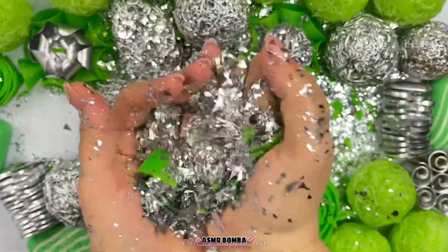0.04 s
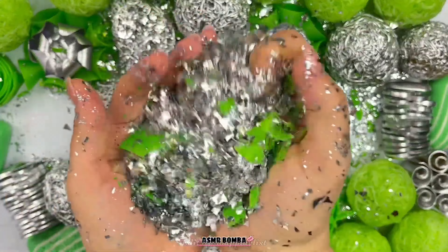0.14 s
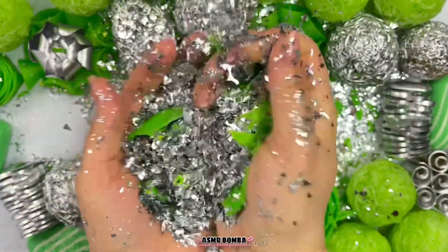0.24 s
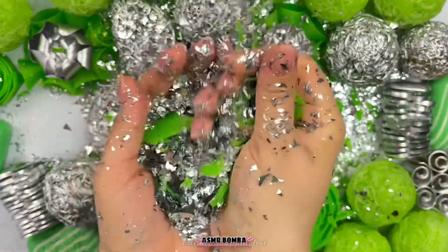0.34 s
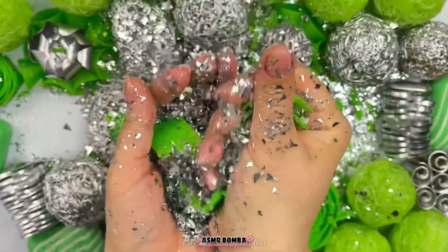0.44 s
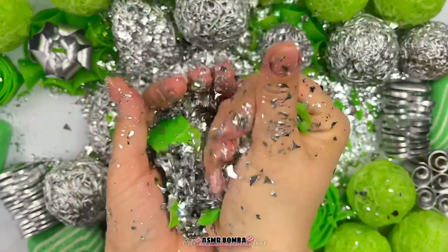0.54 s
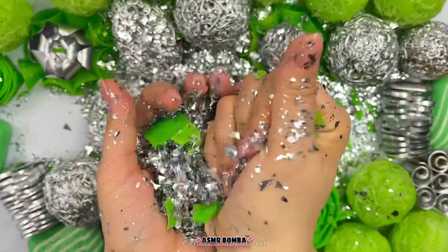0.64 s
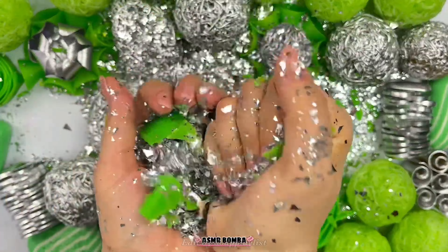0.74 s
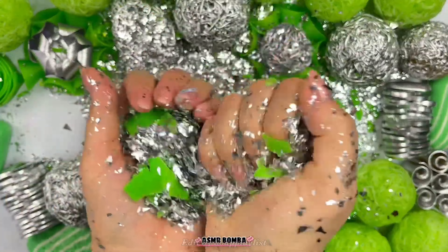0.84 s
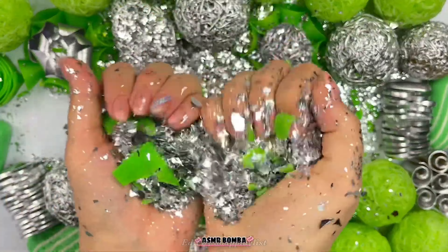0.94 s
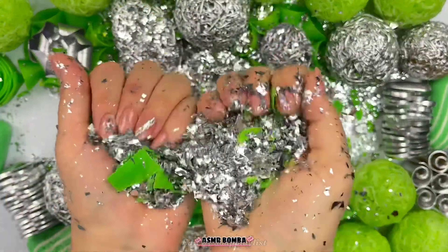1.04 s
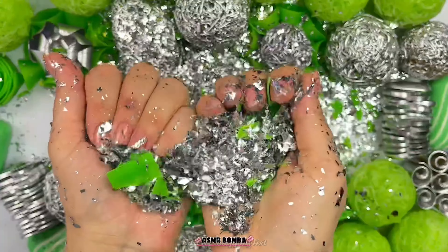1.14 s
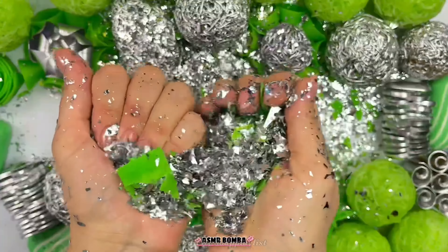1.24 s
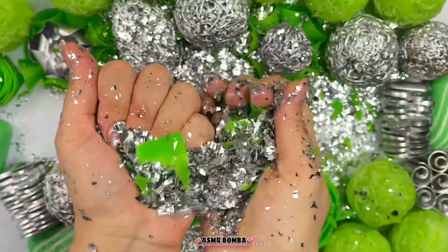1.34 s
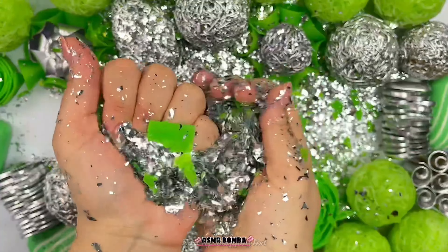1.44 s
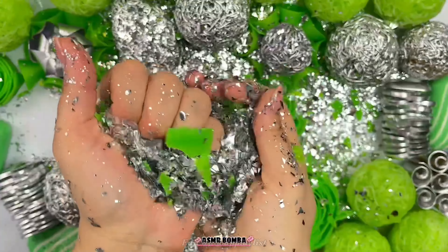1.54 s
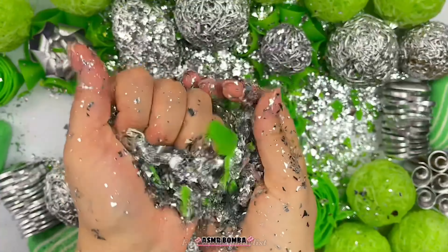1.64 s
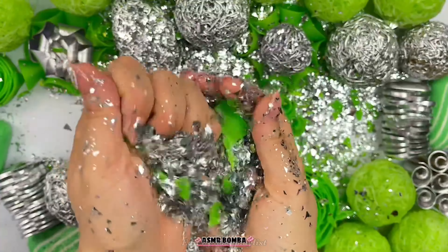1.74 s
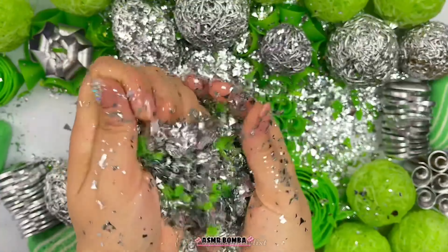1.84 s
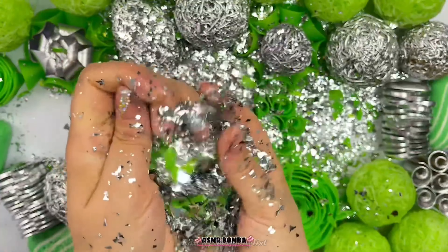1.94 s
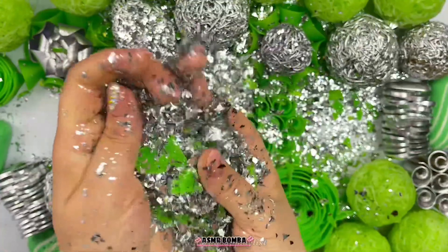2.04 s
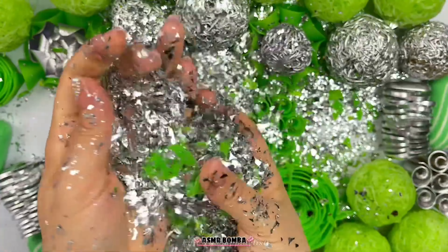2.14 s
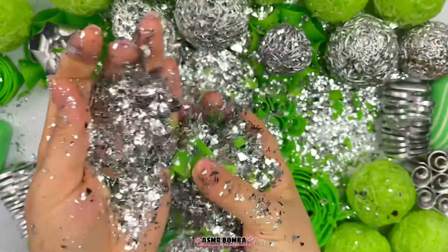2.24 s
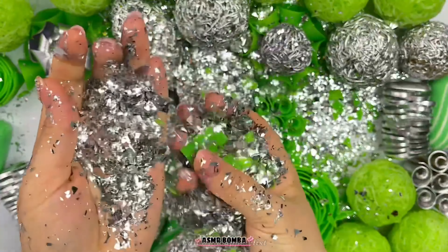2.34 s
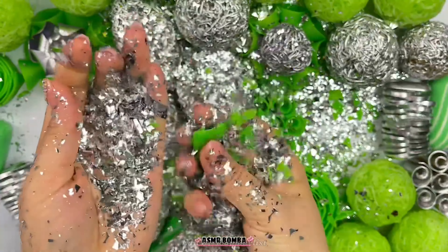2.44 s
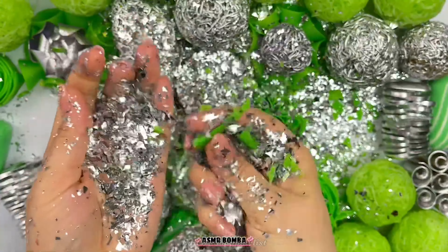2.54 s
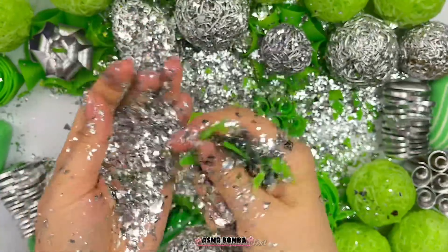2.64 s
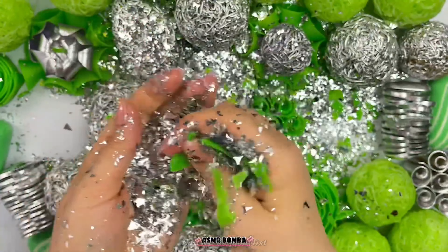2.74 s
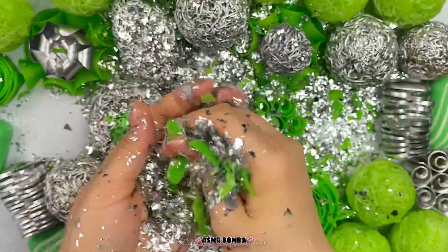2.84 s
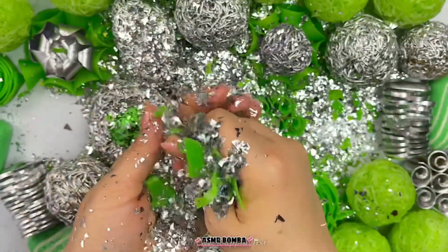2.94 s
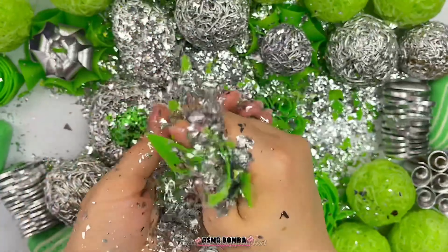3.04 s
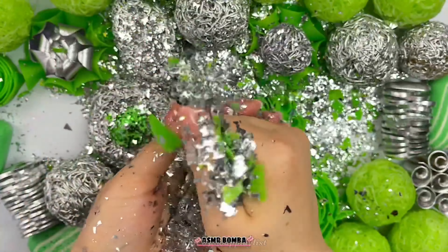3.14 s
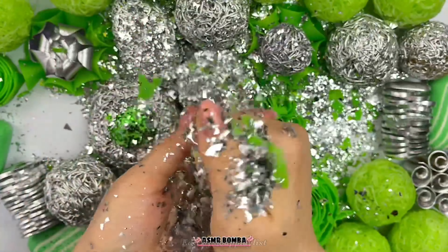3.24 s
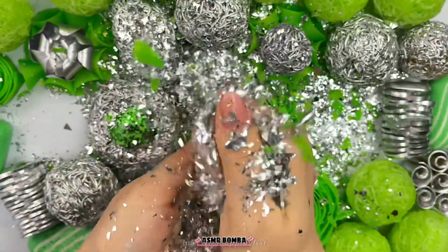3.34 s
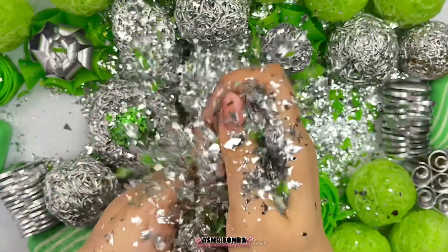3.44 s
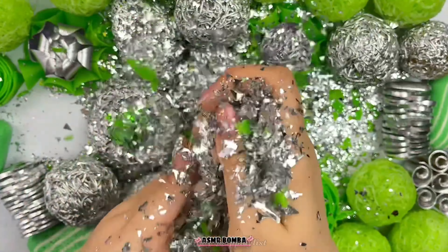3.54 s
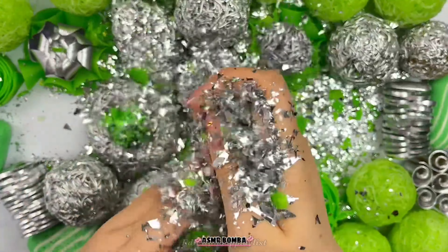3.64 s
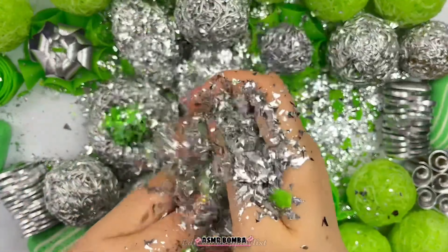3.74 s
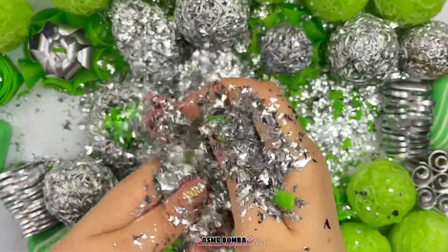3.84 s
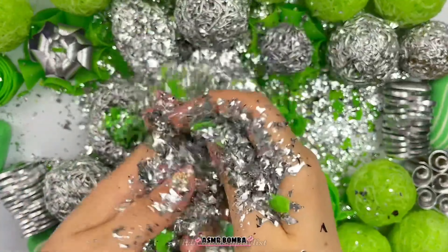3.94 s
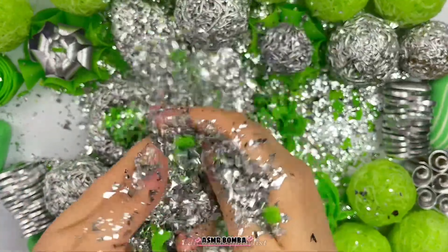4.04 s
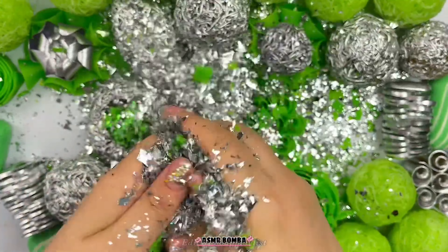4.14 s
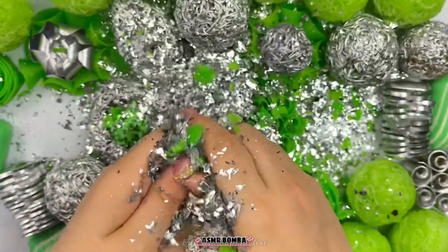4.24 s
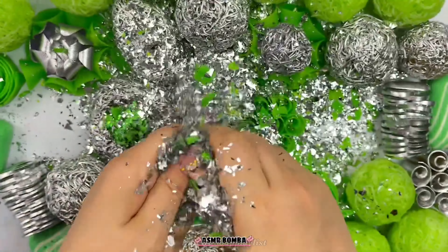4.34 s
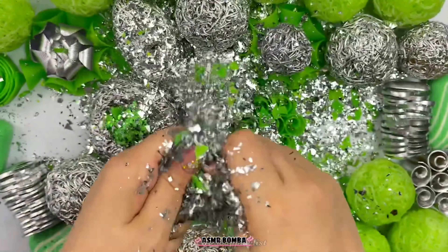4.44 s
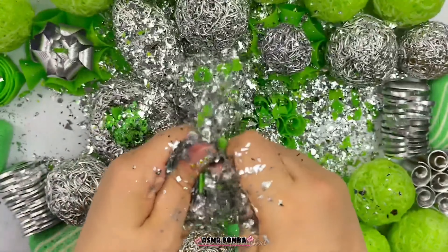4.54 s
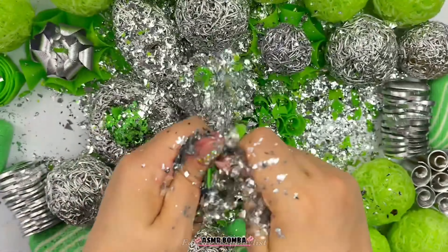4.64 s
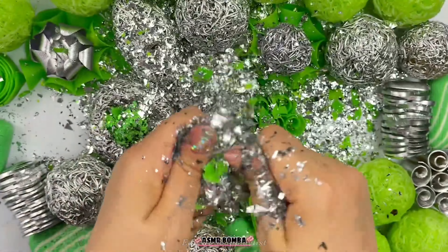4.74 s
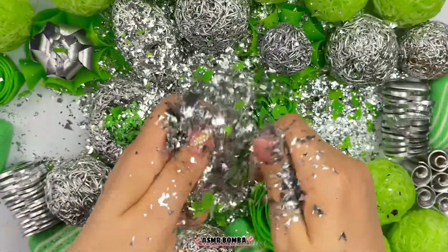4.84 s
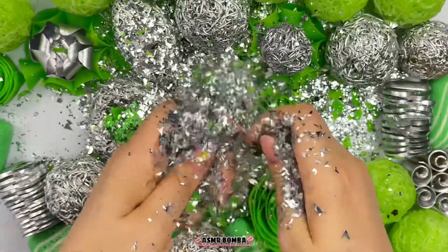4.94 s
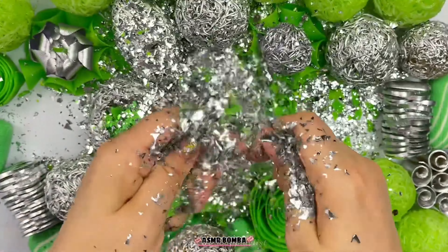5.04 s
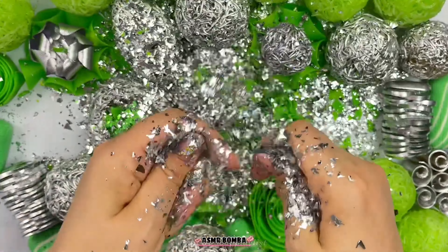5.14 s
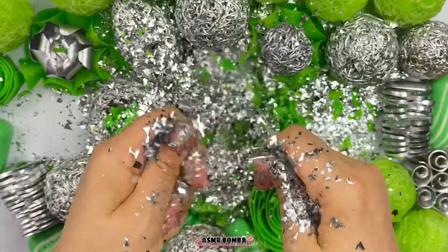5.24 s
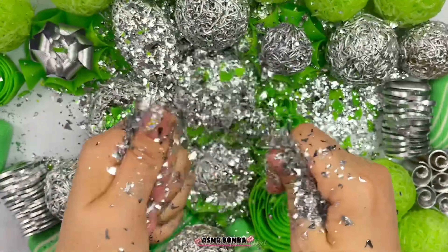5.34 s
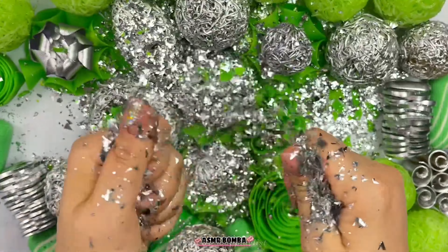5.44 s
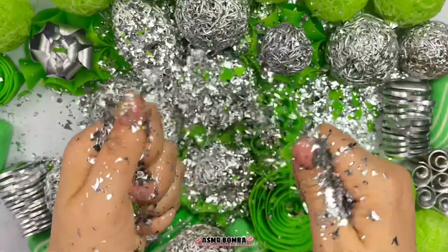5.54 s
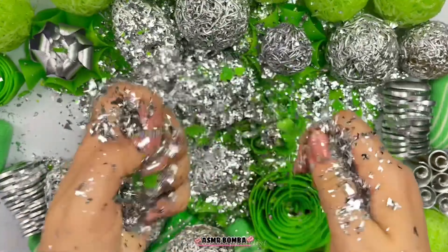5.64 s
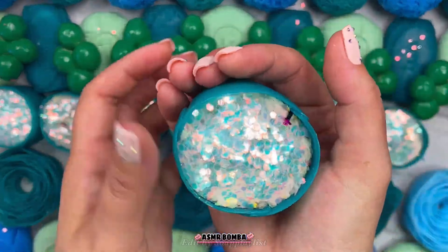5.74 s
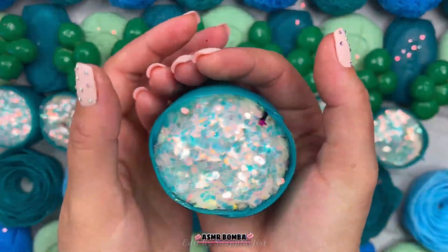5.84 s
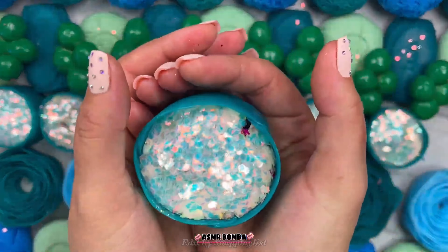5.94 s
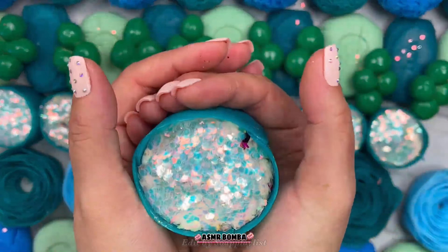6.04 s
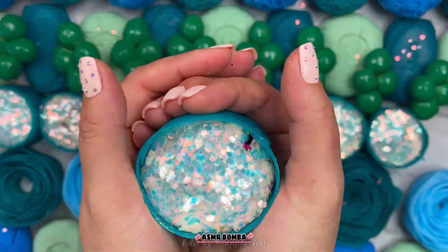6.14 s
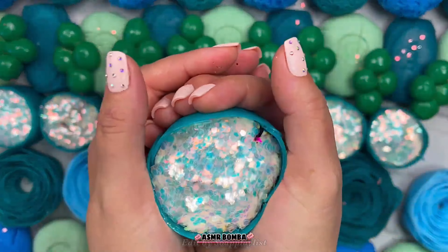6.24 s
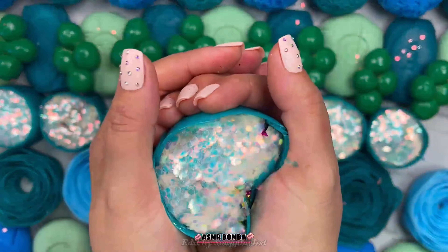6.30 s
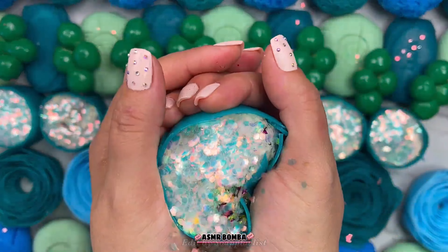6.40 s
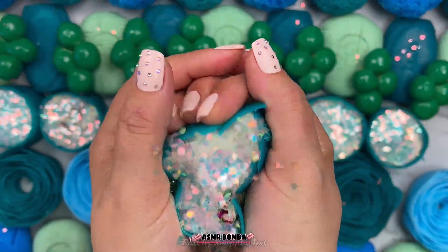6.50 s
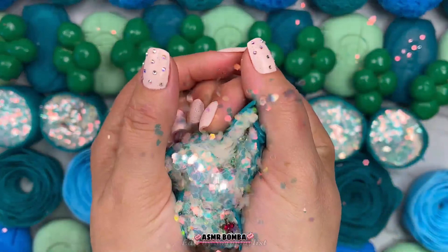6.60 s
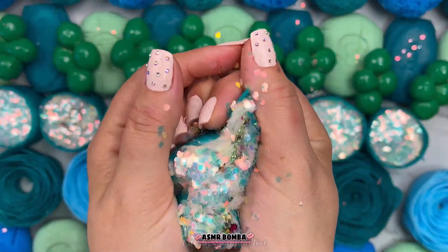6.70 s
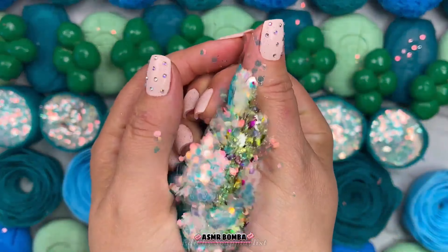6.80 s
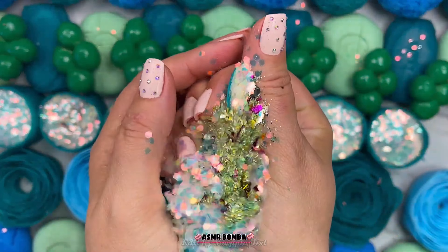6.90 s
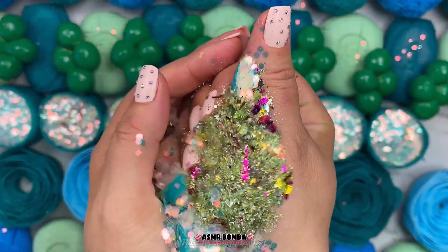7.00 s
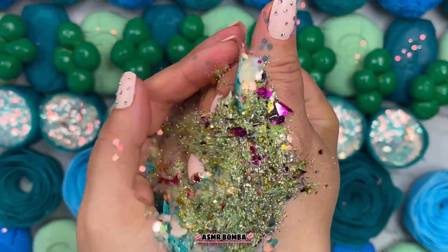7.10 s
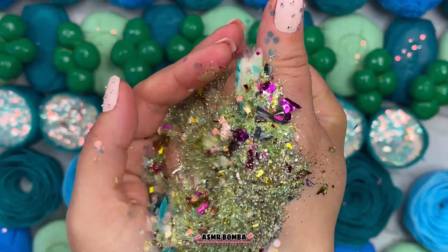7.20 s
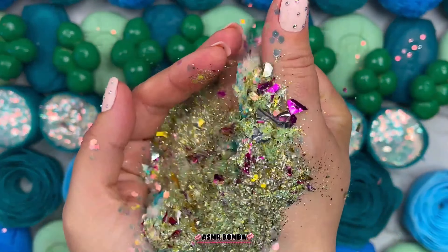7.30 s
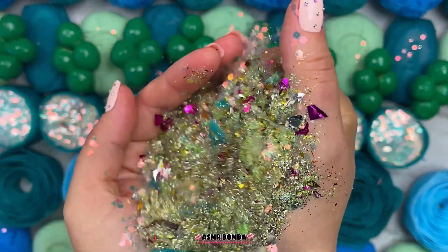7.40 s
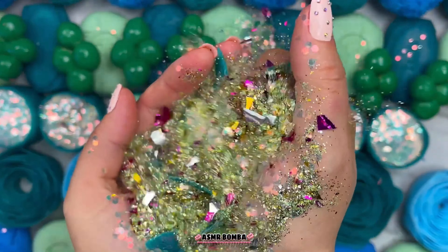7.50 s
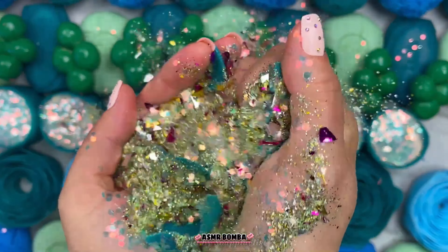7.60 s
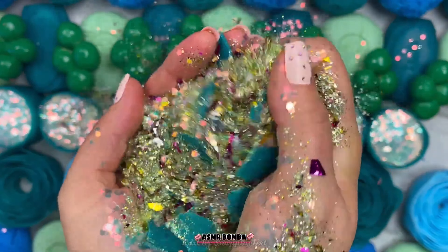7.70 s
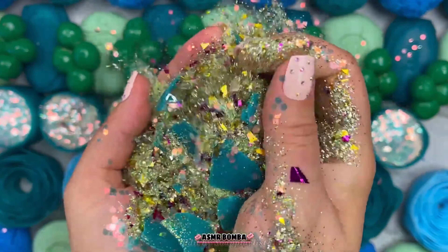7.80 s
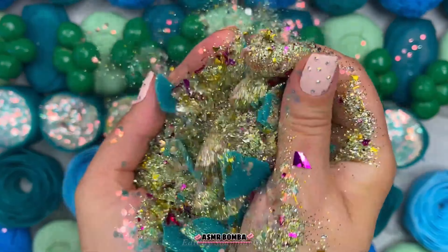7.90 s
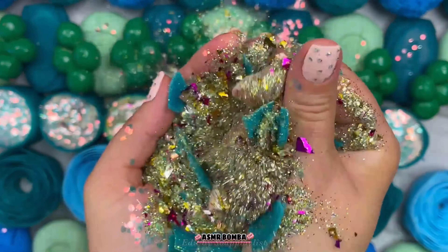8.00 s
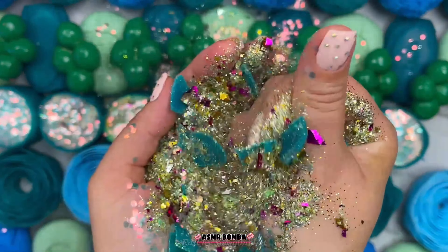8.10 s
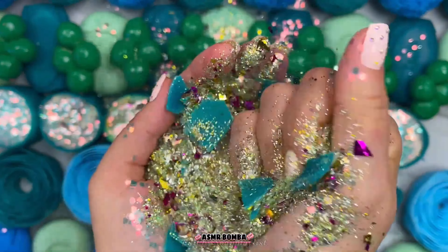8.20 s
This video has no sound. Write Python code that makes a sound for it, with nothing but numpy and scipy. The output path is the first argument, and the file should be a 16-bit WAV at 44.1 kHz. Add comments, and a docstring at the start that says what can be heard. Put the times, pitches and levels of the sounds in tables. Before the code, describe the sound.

Bare hands crush a heap of thin, dry, glitter-coated soap curls at a table, close to the microphone. For the first two seconds there are light, scattered cracks with a soft patter of crumbs and flakes and a few dull knocks. From about 2.3 seconds the crunch grows brighter and busier, with fizzing flakes, tiny high glitter snaps and occasional low thuds through the table. Near 5.7 seconds it drops to a brief lull, and soft steady room noise enters. At about 6.2 seconds a hollow soap shell breaks in a quick run of loud cracks and dull knocks, the loudest slightly overloading around 6.3 to 6.5 seconds. From about 7 seconds the cracks thin out into dense, gritty crumbling, with a low table rumble swelling underneath. A few more cracks come near 8.1 seconds, and the crumbling continues to the end at about 8.3 seconds.

```python
"""At a table, close to a microphone, bare hands crush dry, glitter-coated soap: first a heap of thin
curls, then a hollow shell. Crumbs and flakes patter, pieces crack and scatter fragments, glitter
plates snap. Thick lumps give way with dull knocks; the squeezing hands shake the table with thuds
and rumble. Soft room noise enters with the shell. The loudest cracks overload the recorder."""
import sys
import numpy as np
from scipy import signal
from scipy.fft import rfft, irfft, next_fast_len
from scipy.io import wavfile
from scipy.ndimage import uniform_filter1d

SR = 44100
rng = np.random.default_rng(int(sys.argv[2]) if len(sys.argv) > 2 else 0)


def inscribe(sig):
    """Save sig as 16-bit PCM at rate SR to the path in sys.argv[1].

    A 1-D sig is mono; a 2-D sig holds one channel per row.
    Samples are clipped to [-1, 1] before scaling.
    """
    pcm = np.round(np.clip(np.atleast_2d(sig).T, -1, 1) * 32767)
    wavfile.write(sys.argv[1], SR, pcm.astype(np.int16))


N = 364266

# Falling, rubbing debris in four lists, heap then shell. Each row: time in seconds, glitter level in dB,
# flake level in dB, crumb level in dB.
DEBRIS_LEVELS = [
    [(0.0, -34, -34, -42.5), (0.07, -31, -31.5, -47), (0.15, -43, -44, -54.5), (0.3, -43.5, -43, -55),
     (0.47, -34, -32, -40.5), (0.64, -39, -42, -36.5), (0.87, -38, -37.5, -52.5), (1.14, -44, -42, -54),
     (1.45, -38.5, -37, -44), (1.62, -38.5, -41.5, -53), (1.82, -35.5, -34, -46),
     (1.95, -38.5, -42.5, -55.5), (2.29, -39.5, -47.5, -50)],
    [(2.3, -36, -34, -45), (2.51, -34.5, -37, -52), (2.8, -28.5, -31, -41.5), (3.12, -30.5, -40, -40.5),
     (3.34, -24.5, -31.5, -39), (3.55, -29, -27.5, -37.5), (3.85, -36.5, -38, -50.5), (4.14, -34, -34, -45),
     (4.43, -27.5, -34, -44.5), (4.62, -32, -35, -47.5), (4.82, -31.5, -32.5, -51.5),
     (5.25, -32, -32.5, -42), (5.52, -34.5, -33.5, -51), (5.67, -30, -33.5, -59)],
    [(5.69, -49, -51, -57), (5.85, -49, -38.5, -42), (5.91, -49, -47.5, -58), (6.15, -49, -48, -62)],
    [(6.22, -53, -25, -42), (6.34, -56, -28, -20.5), (6.42, -40, -32, -37.5), (6.55, -48, -25, -26),
     (6.67, -30, -28.5, -29.5), (7.02, -33.5, -28.5, -35), (7.57, -33.5, -34, -37),
     (7.86, -33, -33.5, -39.5), (8.26, -30.5, -26, -29.5)],
]
# Table shaken by the hands. Each row: time in seconds, level in dB.
RUMBLE_LEVELS = [(0.0, -31), (0.16, -42), (0.6, -29), (1.06, -41), (1.5, -31.5), (1.65, -36.5),
                 (3.4, -35.5), (3.65, -29.5), (3.93, -37.5), (4.14, -23.5), (4.28, -41), (4.39, -26),
                 (4.48, -35), (5.5, -33.5), (6.75, -24), (7.13, -11.5), (7.45, -16.5), (7.56, -27),
                 (8.26, -21.5)]
# Pieces breaking. Each row: start in seconds, level in dB, ring pitch in Hz, treble against ring in dB,
# break length in seconds, relative scatter level in dB.
CRACKS = [(0.449, -18.5, 2450, -12, 0.0039, -10.5), (0.495, -18.5, 1110, -15, 0.0023, -19),
          (0.57, -12, 1360, -19, 0.0015, -31), (0.583, -13, 600, -3, 0.0043, -37),
          (0.6496, -3.5, 1050, -22, 0.00094, -29), (0.682, -21, 1010, 0, 0.0035, -28),
          (0.725, -20.5, 1270, -10, 0.0018, -31), (0.771, -14, 1060, -7, 0.00087, -22),
          (0.786, -17, 4450, 0, 0.0021, -17), (1.168, -7.5, 4250, -16, 0.0012, -31),
          (1.223, -22, 1100, -7, 0.00086, -33), (1.269, -24, 1000, 3, 0.0011, -20),
          (1.319, -16.5, 596, 7, 0.0025, -35), (1.352, -13, 960, 6, 0.00064, -37),
          (1.402, -17, 3220, -19, 0.0021, -39), (1.47, -14, 3160, -6, 0.00059, -20),
          (1.503, -13.5, 3480, 1, 0.0039, -41), (1.582, -21, 3500, -4, 0.0007, -33),
          (1.665, -24, 2520, -7, 0.00086, -15), (1.846, -9.5, 2400, -0.5, 0.0012, -12.5),
          (2.313, -9.5, 2220, 9, 0.0038, -18), (2.356, -6.5, 2230, -0.5, 0.0037, -13.5),
          (2.38, -10, 2250, -10, 0.0026, -18), (2.397, -16, 2100, -8, 0.004, -19),
          (2.541, -14.5, 5020, 22, 0.002, -4), (2.548, -5, 4800, 23, 0.0015, -23),
          (2.722, -2.5, 2500, 9, 0.0046, -20), (2.756, -9.5, 5100, -2, 0.0046, -25),
          (2.81, -8, 1690, 21, 0.0038, -23), (2.851, -15.5, 2270, -12, 0.0016, -28),
          (2.931, -5, 4780, 23, 0.00036, -13), (2.9686, -15.5, 1400, 2, 0.0047, -18),
          (3.065, -13, 2640, -16, 0.0057, -41), (3.096, -14.5, 2060, -3, 0.0059, -15.5),
          (3.122, -9.5, 4240, 26, 0.0021, -17), (3.269, -17, 1500, -12, 0.0012, -28),
          (3.278, -16, 1500, -10, 0.0017, -23), (3.331, -3.5, 4000, 4.5, 0.0014, -18),
          (3.939, -5.5, 3180, -9.5, 0.0058, -19.5), (4.0412, -14.5, 3130, 4, 0.0068, -11.5),
          (4.179, -8.5, 1820, -1, 0.0063, -20.5), (4.274, -6, 3170, -13, 0.0083, -19.5),
          (4.364, -7, 1320, 4, 0.001, -17), (4.391, -1, 990, 14, 0.0012, -29),
          (4.497, -10.5, 1880, 6, 0.00087, -19), (4.532, -12.5, 960, 4, 0.0047, -22),
          (4.567, -13, 2160, 5, 0.0096, -30), (4.8172, -5.5, 4500, 2, 0.0042, -28),
          (4.8233, -11.5, 3030, 4.5, 0.013, -13.5), (4.943, -14.5, 2270, -0.5, 0.0043, -10.5),
          (5.061, -21, 2260, -12, 0.002, -39), (5.183, -8, 2300, -26, 0.0026, -24),
          (5.2543, -6.5, 900, 3, 0.0021, -20.5), (6.1616, 9, 4500, -1, 0.0054, -27),
          (6.197, 4.5, 2520, -7.5, 0.0034, -22), (6.235, 2.5, 2580, -4, 0.0014, -27),
          (6.25, 0, 2630, -11, 0.0018, -33), (6.2542, 12, 2530, -12, 0.0014, -36),
          (6.267, 9, 2620, -2, 0.003, -30), (6.28, 10, 2470, -6, 0.0056, -20),
          (6.29, 9.5, 2550, -10, 0.0053, -13.5), (6.3983, -2.5, 2700, -2, 0.0056, -23),
          (6.4358, -6, 3000, -5, 0.0014, -28), (6.4472, 8, 2300, -13, 0.00096, -24),
          (6.45, 13, 2480, -11, 0.00088, -40), (6.453, 6, 2880, -21, 0.011, -29),
          (6.481, 3, 3060, -23, 0.0055, -28), (6.49, 2, 1090, 0, 0.0021, -9.5),
          (6.494, -0.5, 3740, -15, 0.005, -30), (6.5224, -8.5, 1180, 7, 0.0027, 3),
          (6.5233, 2, 1210, -17, 0.0094, -9), (6.5365, 5, 1020, 12, 0.0019, -37),
          (6.6148, -2, 3520, 5, 0.0009, -19.5), (6.6197, -10, 1000, 0, 0.00081, -28),
          (6.631, 2, 2460, 0, 0.0019, -20), (6.719, -13, 3790, -1, 0.0013, -15),
          (6.7231, -3, 1290, 0, 0.0023, -8.5), (6.7358, 3.5, 2440, -17, 0.0025, -24),
          (6.7423, 3, 2380, 0, 0.0022, -35), (6.755, 2.5, 2520, -3, 0.002, -23.5),
          (6.824, -5.5, 2170, -6, 0.0028, -19), (6.8612, 2.5, 1250, -19, 0.0038, -12.5),
          (6.87, 1.5, 1800, -21, 0.0028, -16), (6.957, -12, 3500, 2, 0.00068, -22),
          (7.019, 1, 1420, -3, 0.0017, -19), (7.042, -7.5, 2520, -15, 0.0013, -21),
          (7.0695, -7.5, 2240, -16, 0.0018, -15), (7.08, -4.5, 2200, -16, 0.00065, -30),
          (7.119, -8, 2400, -12, 0.00092, -18), (7.1435, -9, 1190, -10, 0.0015, -21),
          (7.165, -10.5, 1240, -5, 0.00058, -25), (7.196, -4, 2330, -2, 0.0008, -24),
          (7.268, -10, 1070, -20, 0.0015, -28), (7.309, -6.5, 1100, -15, 0.0028, -18),
          (7.378, -14, 2500, -6, 0.002, -4), (7.4337, -15, 2450, -7, 0.00062, -12.5),
          (7.446, -4.5, 2210, -22, 0.00091, -41), (8.096, -7, 1150, -11, 0.0016, -21),
          (8.111, -2, 5400, 15, 0.0026, -16), (8.142, -5, 1090, -13, 0.00045, -18)]
# Glitter plates snapping. Each row: start in seconds, level in dB, ring pitch in Hz.
SNAPS = [(0.5274, -15, 11300), (0.642, -12, 7700), (2.593, -8, 11800), (2.678, -6, 11200),
         (3.3069, -10, 13800), (3.7309, -3, 14500), (3.8695, -6, 12000), (4.7561, -7, 8120),
         (5.1285, -7, 11800), (5.1452, -1, 13400), (5.1603, -10, 7950), (5.2004, -1.5, 12500),
         (5.2954, -4, 7400), (5.3328, -13, 12500), (5.469, -10, 7960), (5.5717, 1, 14900)]
# Soft blows. Each row: start in seconds, peak in dB, nominal pitch in Hz.
KNOCKS = [(0.568, -18, 287), (0.601, -16.5, 196), (0.629, -18, 170), (0.65, -12.5, 165), (0.771, -15, 170),
          (1.164, -17, 254), (1.268, -21, 314), (1.456, -10, 203), (1.463, -9, 250), (3.254, -18, 240),
          (3.941, -22, 477), (4.274, -18.5, 610), (4.367, -13, 298), (4.3885, -11.5, 300), (5.25, -10, 292),
          (5.445, -12.5, 332), (6.194, -12.5, 176), (6.284, -2.5, 590), (6.45, -0.5, 226),
          (6.482, -1.5, 490), (6.523, -1.5, 474), (6.627, -14.5, 255), (6.74, -9, 331), (6.868, -5.5, 476),
          (7.997, -10.5, 229)]  # thick lumps giving way
THUDS = [(0.756, -32, 114), (2.5492, -9, 92), (2.752, -20, 51.5), (3.248, -18, 104), (3.691, -10.5, 50.4),
         (5.42, -17.5, 63.4), (6.176, -14.5, 52), (6.29, -15, 90), (6.734, -12.5, 82), (6.861, -7.5, 78),
         (7.325, -9, 53), (7.511, -14, 116), (8.114, -27, 112)]  # lumps and knuckles on the table
# Spectra. Each row: frequency in Hz, relative density in dB.
GLITTER_SPECTRUM = [(5290, -18), (9000, -10.5), (12800, -4.5), (14300, -8.5), (15600, -8)]
FLAKE_SPECTRUM = [(1590, -40), (2700, -4.5), (4090, -2.5), (4890, -5.5), (7940, -1.5), (9500, -9.5),
                  (12400, -36), (20900, -120)]
RASP_SPECTRUM = [(900, -49), (1450, -8), (1950, -1.5), (2300, 0.5), (2800, -11), (4000, -18)]  # soap rubbed in cupped hands
CRUMB_SPECTRUM = [(120, -12), (200, -2), (280, -8), (830, -11), (1200, -10.5), (1700, -10), (2600, -42),
                  (5000, -50)]
SHAKE_SPECTRUM = [(6, 5), (25, 7.5), (59, 1.5), (146, -10.5), (250, -27.5), (320, -41), (550, -120)]  # table under the hands
SHUDDER_SPECTRUM = [(20, -9), (50, 2.5), (110, 5), (200, -12.5), (400, -22)]  # table after a blow
ROOM_SPECTRUM = [(88, -41), (150, -1), (1010, -18.5), (1710, -24.5), (2000, -21.5), (2830, -25),
                 (6050, -34), (15700, -45)]

# Hollows that colour the scatter. Each: pitch in Hz, width over pitch, largest share of the scatter.
CUPPED_HANDS, SHELL = (2050, 0.42, 0.75), (2800, 0.6, 0.45)
SHELL_FROM_S = 5.68
CREST_DB = 6  # allowance for a burst's peak over its strongest stretch


def gain_of(db):
    return 10 ** (np.asarray(db) / 20)


def unit_rms(x):
    return x / np.sqrt(np.mean(x ** 2) + 1e-20)


def curves(rows):
    """One per-sample curve for each column after the time."""
    times_s, *columns = np.vstack(rows).T
    return [np.interp(np.arange(N) / SR, times_s, column) for column in columns]


def coloured(x, spectrum):
    """Filters by a spectrum that is silent beyond its ends; rms 1."""
    size = next_fast_len(N)
    hz = np.fft.rfftfreq(size, 1 / SR)
    points_hz, points_db = np.transpose(spectrum)
    db = np.interp(np.log(hz + 1), np.log(points_hz + 1), points_db)
    inside = (hz >= points_hz[0]) & (hz <= 1.1 * points_hz[-1])
    return unit_rms(irfft(rfft(x, size) * gain_of(db) * inside, size)[:N])


def ring(x, hz, width, order=1, window=32):
    """Resonance, width as a share of pitch; rms 1 over its strongest window of samples."""
    radius = np.exp(-np.pi * width * hz / SR)
    poles = [1, -2 * radius * np.cos(2 * np.pi * hz / SR), radius ** 2]
    y = np.diff(x, prepend=0)
    for _ in range(order):
        y = signal.lfilter([1], poles, y)
    return y / np.sqrt(uniform_filter1d(y ** 2, window).max())


def tap_gate(threshold_db=-43, span_db=0.5):
    """0 to 1: single taps stand out only once the flakes rise above a soft rustle."""
    _, flake_db, _ = curves(DEBRIS_LEVELS)
    return np.clip((flake_db - threshold_db) / span_db, 0, 1)


def impulses(per_s, spread_db):
    """Randomly timed impacts of uneven size."""
    sizes = gain_of(spread_db * np.minimum(rng.exponential(1, N), 4))
    return sizes * (rng.random(N) < per_s / SR)


def patter(per_s, spread_db, band_hz, decay_cycles, rustle_share, pitches=16):
    """Clumps of tiny taps, each briefly ringing at its own pitch, over a smooth rustle."""
    clumps = gain_of(3 * unit_rms(uniform_filter1d(rng.standard_normal(N), 500)))
    hits = impulses(per_s * clumps, spread_db)
    pitch_index, taps = rng.integers(0, pitches, N), np.zeros(N)
    for k, hz in enumerate(np.geomspace(*band_hz, pitches)):
        cycles = np.arange(400) / SR * hz
        tap = np.exp(-cycles / decay_cycles) * np.sin(2 * np.pi * cycles)
        taps += signal.oaconvolve(hits * (pitch_index == k), tap / np.linalg.norm(tap) * np.sqrt(hz))[:N]
    tap_share = tap_gate() * (1 - rustle_share)
    return np.sqrt(tap_share) * unit_rms(taps) + np.sqrt(1 - tap_share) * rng.standard_normal(N)


def drifting(x, depth_db=1.8, patch_hz=2500, patch_s=0.05):
    """The colour drifts: random patches of time and pitch rise and fall."""
    frames = signal.stft(x, nperseg=512, noverlap=384)[2]
    patches = rng.standard_normal(frames.shape[::-1]).T
    for _ in range(2):
        patches = uniform_filter1d(patches, round(patch_hz * 512 / SR), axis=0)
        patches = uniform_filter1d(patches, round(patch_s * SR / 128), axis=1)
    return signal.istft(frames * gain_of(depth_db * unit_rms(patches)), nperseg=512, noverlap=384)[1][:N]


def crumbling():
    """From high to low: glitter sparkles, thin flakes fizz, rubbed soap rasps, coarse crumbs tick."""
    glitter_db, flake_db, crumb_db = curves(DEBRIS_LEVELS)
    rasp_db = 0.6 * flake_db + 0.4 * crumb_db - 5.5
    glitter = patter(1100, spread_db=-1.5, band_hz=(8800, 14200), decay_cycles=1.1, rustle_share=0.52)
    flakes = patter(700, spread_db=4.6, band_hz=(2400, 9560), decay_cycles=1.7, rustle_share=0.75)
    rasp = patter(250, spread_db=4, band_hz=(1510, 2780), decay_cycles=1.2, rustle_share=0.9, pitches=8)
    crumbs = patter(150, spread_db=3.5, band_hz=(400, 1600), decay_cycles=0.5, rustle_share=0.92,
                    pitches=8)
    layers = [(glitter_db, glitter, GLITTER_SPECTRUM), (flake_db, flakes, FLAKE_SPECTRUM),
              (rasp_db, rasp, RASP_SPECTRUM), (crumb_db, crumbs, CRUMB_SPECTRUM)]
    return drifting(sum(gain_of(db) * coloured(x, spectrum) for db, x, spectrum in layers))


def splinter_ticks(ring_hz=1900, decay_s=0.000043):
    """Stray splinters: lone, sharp clicks with a short dry ring wherever flakes move."""
    t = np.arange(100) / SR
    hits = impulses(per_s=90, spread_db=2)
    clicks = np.diff(hits * rng.choice([-1, 1], N), prepend=0)
    body = signal.oaconvolve(hits, np.exp(-t / decay_s) * np.sin(2 * np.pi * ring_hz * t))[:N]
    _, flake_db, _ = curves(DEBRIS_LEVELS)
    return gain_of(flake_db + 11) * tap_gate() * (clicks + 0.31 * body)


def table_rumble(shudder_db=-13, rise_s=0.0027, fall_s=0.02):
    """Low shaking carried through the table, plus a short shudder after every blow."""
    power, t = np.zeros(N), np.arange(9000) / SR
    jolt = (1 - np.exp(-t / rise_s)) * np.exp(-t / fall_s)
    for start_s, db, _ in THUDS + KNOCKS:
        add(power, start_s, (gain_of(db + shudder_db) * jolt / jolt.max()) ** 2)
    shake = gain_of(curves(RUMBLE_LEVELS)[0]) * coloured(rng.standard_normal(N), SHAKE_SPECTRUM)
    shudder = np.sqrt(power) * coloured(rng.standard_normal(N), SHUDDER_SPECTRUM)
    return shake + shudder


def add(mix, start_s, sound):
    part = mix[round(start_s * SR):][:len(sound)]
    part += sound[:len(part)]


def cracks(ring_width_hz=1300, treble_hz=6400, dull_t60_s=0.23, bright_t60_s=0.097):
    """A fracture is a ragged burst of splinters as long as the break runs; then fragments scatter."""
    out, t = np.zeros(N), np.arange(5000) / SR
    for start_s, db, hz, treble_db, length_s, scatter_db in CRACKS:
        low, high, bits, grit, lumps = rng.standard_normal((5, len(t)))
        progress, treble = t / length_s, gain_of(treble_db)
        ragged = gain_of(2.8 * unit_rms(uniform_filter1d(lumps, 40)))
        burst = np.minimum(progress / 0.12, 1) * np.exp(-progress ** 5.8) * ragged
        body = 1.004 * ring(low * burst, hz, ring_width_hz / hz, order=2)
        dry_edge = 0.7 * ring(bits * burst, 0.9 * hz, width=1.5)
        fracture = body + dry_edge + treble * ring(high * burst, treble_hz, width=1)

        spill = ragged * np.minimum(progress, 1)
        hollow = SHELL if start_s > SHELL_FROM_S else CUPPED_HANDS
        dull = fragments(bits * spill * gain_of(-60 * t / dull_t60_s), hz, hollow)
        bright = ring(grit * spill * gain_of(-60 * t / bright_t60_s), treble_hz, width=0.13, window=600)
        scatter = gain_of(scatter_db) * (2.1 * dull + 0.79 * treble * bright)
        gain = gain_of(db - CREST_DB) / np.sqrt(1 + treble ** 2)
        add(out, start_s - 0.0002, gain * (fracture + scatter))
    return out


def fragments(noise, crack_hz, hollow):
    """Fragments scatter partly loose, partly ringing a hollow; deep breaks hardly stir it."""
    hollow_hz, width, max_share = hollow
    share = max_share * min(crack_hz / hollow_hz, 1) ** 2
    enclosed = ring(noise, hollow_hz * (crack_hz / hollow_hz) ** 0.15, width, order=2, window=600)
    loose = ring(noise, 0.53 * crack_hz, width=1, window=600)
    return share * enclosed + (1 - share) * loose


def glitter_snaps(decay_s=0.00056):
    """A plate snaps: a spit of noise through a wide, high resonance, without body."""
    out, t = np.zeros(N), np.arange(400) / SR
    for start_s, db, hz in SNAPS:
        spit = rng.standard_normal(len(t)) * np.exp(-t / decay_s)
        add(out, start_s, gain_of(db - CREST_DB) * ring(spit, hz, width=0.32))
    return out


def soft_blows(rows, rise_cycles, decay_cycles):
    """Knock or thud: a sudden push, then a low swing or two that sag in pitch."""
    out = np.zeros(N)
    for start_s, db, hz in rows:
        cycles = np.arange(4000) / SR * hz
        envelope = (1 - np.exp(-cycles / rise_cycles)) * np.exp(-cycles / decay_cycles)
        swing = envelope * np.sin(2 * np.pi * cycles ** 0.78)
        add(out, start_s, gain_of(db) * swing / abs(swing).max())
    return out


def room_noise(level_db=-38.5):
    """Soft steady room noise, heard from the shell on."""
    heard = np.arange(N) > SHELL_FROM_S * SR
    return gain_of(level_db) * heard * coloured(rng.standard_normal(N), ROOM_SPECTRUM)


def scene():
    """Mono mix; knocks and thuds push in opposite directions."""
    rumble = table_rumble()
    soap = cracks() + glitter_snaps() + crumbling() + splinter_ticks()
    knocks = soft_blows(KNOCKS, rise_cycles=0.22, decay_cycles=0.39)
    thuds = soft_blows(THUDS, rise_cycles=0.2, decay_cycles=0.76)
    return (rumble + soap - knocks + thuds + room_noise())[None]


def record(dry):
    """Hard overload near full scale, then the band limit."""
    clip_level, cutoff_hz = 0.98, 15900
    lowpass = signal.firwin(511, cutoff_hz, window=("kaiser", 7), fs=SR)
    return signal.oaconvolve(np.clip(dry, -clip_level, clip_level), lowpass[None], "same")


dry = scene()
out = record(dry)
inscribe(out)
```